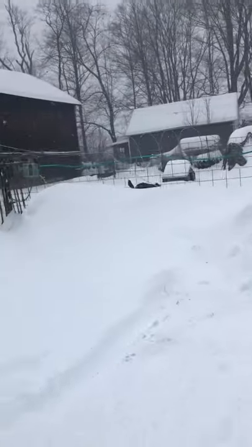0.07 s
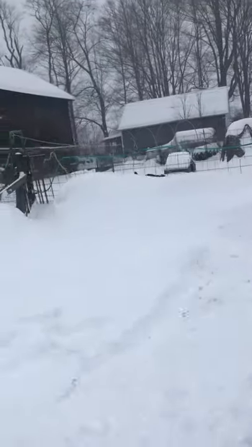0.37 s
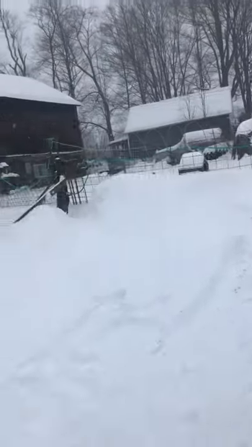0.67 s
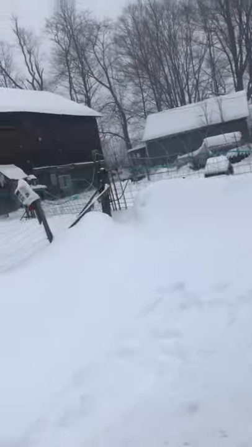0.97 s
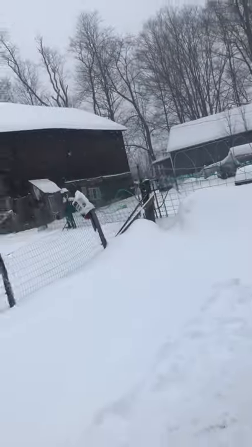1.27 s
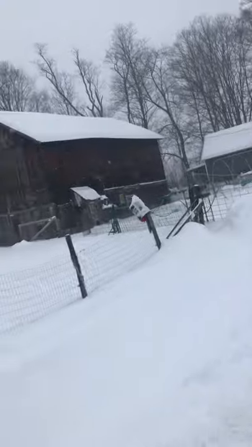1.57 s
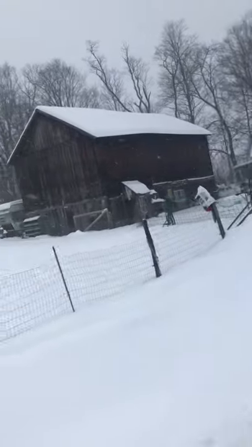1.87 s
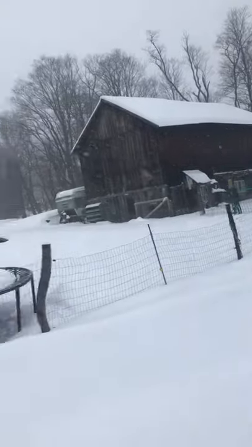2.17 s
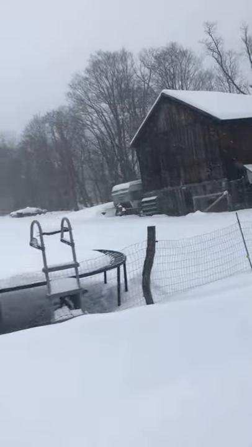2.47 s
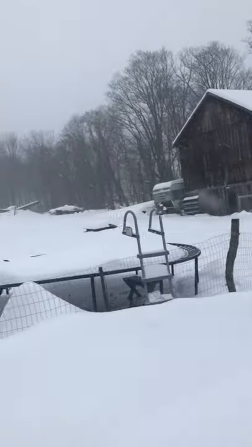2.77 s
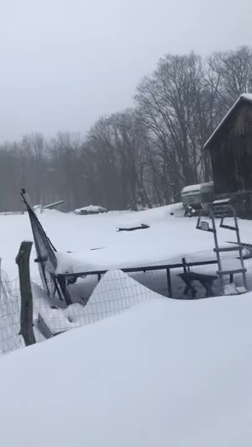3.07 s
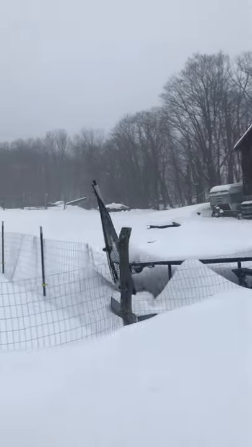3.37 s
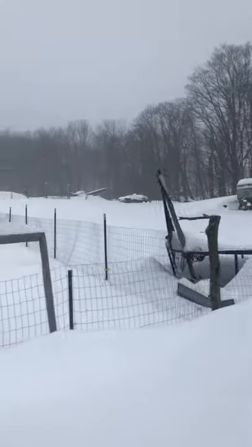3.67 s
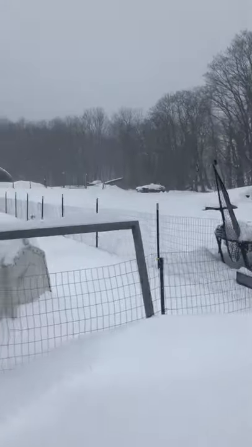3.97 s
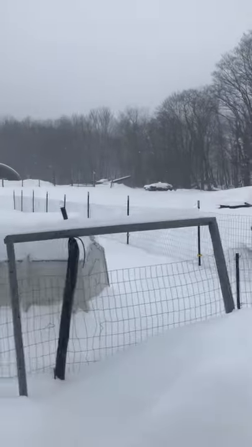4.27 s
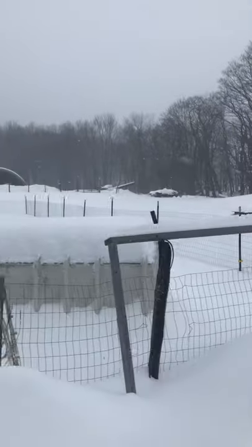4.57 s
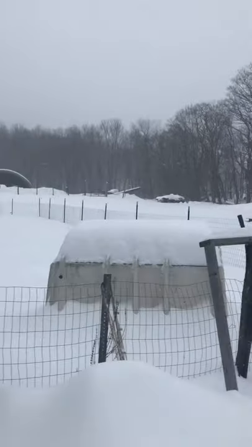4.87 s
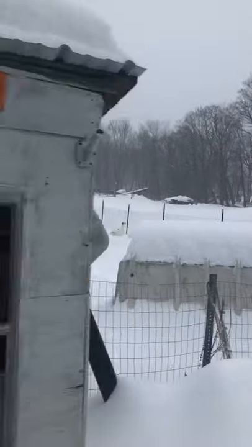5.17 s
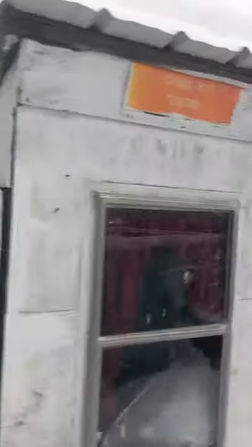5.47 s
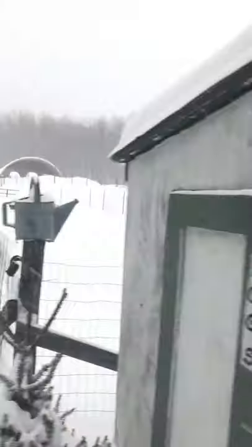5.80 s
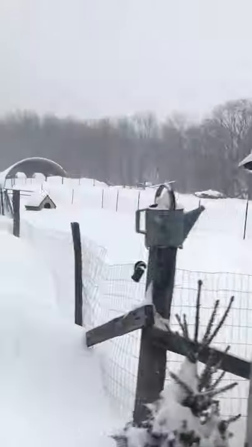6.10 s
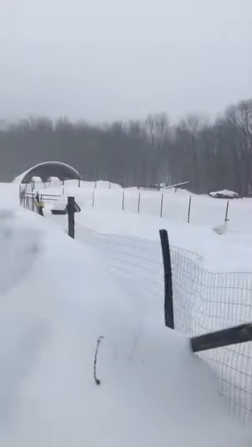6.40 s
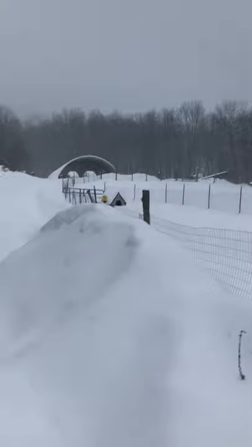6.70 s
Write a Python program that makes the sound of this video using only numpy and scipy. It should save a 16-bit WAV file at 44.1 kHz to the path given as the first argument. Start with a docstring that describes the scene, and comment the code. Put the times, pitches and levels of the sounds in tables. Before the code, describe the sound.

A deep, pulsing engine drone fills the cab of a pickup creeping through a snowy farmyard, with the microphone at the seat beside an open window. Snow crunches under the tyres with many small dull thuds, and ruts jolt the rumbling body. Light rustles and ticks sound nearby over a soft hiss of air. The drone weakens as the engine speeds up slightly, then a shed whooshes softly past and the cab briefly shudders.

```python
"""A pickup, a V8 by its sound, rolls slowly past a snowy farmyard, heard inside with a window open.
Its exhaust pulses boom in the cab at low revs, then thin out as the engine speeds up.
The body rumbles and thumps over ruts, the tyres scrunch and squeak on packed snow, and air hisses
at the window. Something close by rustles and ticks, and a few faint, very high tones come and go.
Late on, a shed wall whooshes past."""
import sys
import numpy as np
from scipy import signal
from scipy.fft import rfft, irfft
from scipy.io import wavfile
from scipy.ndimage import uniform_filter1d, map_coordinates

SR = 44100
rng = np.random.default_rng(int(sys.argv[2]) if len(sys.argv) > 2 else 0)


def file_out(sig):
    """Save sig as 16-bit WAV at sys.argv[1]."""
    # one column per channel
    cols = np.atleast_2d(sig).T
    # limit, then scale
    lim = np.clip(cols, -1, 1)
    pcm = np.round(lim * 32767).astype(np.int16)
    wavfile.write(sys.argv[1], SR, pcm)


N = 306054
TIME = np.arange(N) / SR


def undb(db):
    """Turn decibels into a gain."""
    return 10 ** (np.asarray(db) / 20)


def unit(x):
    """Scale to an average (rms) level of 1."""
    return x / np.sqrt(np.mean(x ** 2))


def curves(table):
    """Join the points in each column of a time table with straight lines."""
    times, *columns = np.transpose(table)
    return [np.interp(TIME, times, column) for column in columns]


def walk(rate_hz):
    """A smooth random wander, about 1 in size, with no big jumps."""
    size = 4096
    f = np.arange(size // 2 + 1) * SR / N
    coarse = irfft(rfft(rng.standard_normal(size)) / (1 + (f / rate_hz) ** 4), size)
    smooth = np.interp(TIME, np.linspace(0, TIME[-1], size), coarse)
    return unit(np.tanh(unit(smooth) / 2))


def colour(x, spectrum):
    """Shape the lows and highs of a sound by (f/Hz, level/dB) points."""
    hz, db = np.transpose(spectrum)
    f = np.maximum(np.arange(N // 2 + 1) * SR / N, 1)
    gain = undb(np.interp(np.log(f), np.log(hz), db, left=-80, right=-80))
    return unit(irfft(rfft(x) * gain, N))


def band(x, lo_hz, hi_hz):
    """Keep the sound between two frequencies."""
    return signal.sosfilt(signal.butter(3, [lo_hz, hi_hz], "bandpass", fs=SR, output="sos"), x)


def noise_band(lo_hz, hi_hz):
    """Steady noise between two frequencies."""
    return unit(band(rng.standard_normal(N), lo_hz, hi_hz))


def grains(per_s, spread_db):
    """Random clicks, mostly small, a few larger."""
    chance, size, sign = rng.random(N), rng.exponential(size=N), rng.choice([-1, 1], N)
    return (chance < per_s / SR) * sign * undb(spread_db * np.minimum(size, 3))


def burst(decay_s, rise):
    """Noise that swells and dies away; rise is a share of the decay time."""
    age = TIME[:SR // 5] / max(decay_s, .002)
    shape = (1 - np.exp(-age / rise)) * np.exp(-age)
    return rng.standard_normal(len(age)) * shape / shape.max()


def even(x, length_s):
    """Give a burst the energy of a level-1 sound of this length."""
    return x / np.sqrt(np.sum(x ** 2) / (length_s * SR))


def add(out, s, sound):
    """Mix a sound in at s seconds."""
    i = max(int(s * SR), 0)
    out[i:i + len(sound)] += sound[:N - i]


# How fast the cylinders fire: t/s, f/Hz
FIRING_RATE = [(0.0, 87.35), (0.5, 88.37), (1.41, 80.54), (2.2, 78.57), (3.09, 79.27), (3.59, 82.44),
               (4.1, 92.5), (4.64, 89.58), (5.08, 90.3), (5.6, 95.2), (5.78, 100.6), (6.0, 101.5),
               (6.25, 96.5), (6.94, 92.8)]
# The exhaust's boom in the cab: t/s, level/dB
BOOM = [(0.05, -20), (0.64, -20.5), (1.0, -19), (2.2, -20.5), (3.41, -19), (3.58, -19.5), (3.92, -28),
        (4.15, -33.5), (4.36, -35.5), (4.68, -27.5), (4.92, -30.5), (5.2, -48.5), (5.91, -29.5),
        (6.23, -41.5), (6.9, -28.5)]
# Throbs of the boom at higher revs: t/s, level/dB
THROBS = [(5.439, -22.5), (5.753, -18.5), (6.244, -16), (6.329, -21.5), (6.509, -21.5), (6.584, -35),
          (6.803, -44)]
# Tones around the boom: t/s, level/dB at twice its pitch, level/dB at three times, lope gain/dB
OVERTONES = [(0.0, -30, -41, -10), (0.65, -26.5, -42.5, -0.5), (1.05, -36.5, -45.5, -13.5),
             (1.6, -48, -53.5, -8), (2.3, -47.5, -52, -6), (2.6, -37.5, -45, -2), (3.45, -46, -44.5, -5),
             (3.65, -34, -55, -1), (3.9, -28.5, -36.5, -4), (4.1, -39.5, -41, 4), (4.3, -36.5, -52, -6.5),
             (4.55, -36, -38, 3.5), (4.75, -36, -33, -2), (5.15, -47, -46, -2), (5.65, -46, -39.5, -1),
             (5.92, -50, -49, 1), (6.2, -46.5, -56, -3), (6.9, -55, -55, -1.5)]
# The lope, tones from uneven cylinders: multiple of the engine's cycle rate, level/dB
LOPE = [(5, -45), (6, -50.5), (7, -41.5), (9, -46), (12, -48.5), (13, -46), (15, -55), (17, -53), (18, -51),
        (21, -49.5), (32, -58), (37, -54), (40, -61)]
# Pitches that the air in the cab boosts or dulls: f/Hz, width/Hz, gain/dB
CAB_RESONANCES = [(165.8, 8.8, 14.5), (268, 11, -5)]

def engine(throb_s=0.026):
    """Eight firings a cycle make the boom; as it thins, it flutters and its overtones break up."""
    firing_hz, = curves(FIRING_RATE)
    boom_db, = curves(BOOM)
    *overtones_db, lope_db = curves(OVERTONES)
    firing_phase = 2 * np.pi * np.cumsum(firing_hz) / SR
    thin_db = boom_db.max() - boom_db
    phase_wobble = 0.056 * thin_db
    flutter_db = (0.13 + 0.25 * thin_db) * walk(27)
    throb = sum(undb(db - 6) * np.exp(-((TIME - s) / throb_s) ** 2) for s, db in THROBS)
    out = -(undb(boom_db - 0.2 + flutter_db) + throb) * np.cos(firing_phase)
    for multiple, db in enumerate(overtones_db, 2):
        rough_db = (1 + 0.19 * thin_db) * walk(23.4)
        out -= undb(db + rough_db) * np.cos(multiple * firing_phase + phase_wobble * walk(10))
    for multiple, db in LOPE:
        ratio = multiple / 8
        cab_db = sum(gain / (1 + (2 * (ratio * firing_hz - hz) / width) ** 2)
                     for hz, width, gain in CAB_RESONANCES)
        phase = ratio * firing_phase + 2 * np.pi * rng.random() + phase_wobble * walk(7.7)
        out += undb(db + lope_db + cab_db + 4 * walk(6.8)) * np.cos(phase)
    return np.sqrt(2) * out


# The tone of the body's rumble: f/Hz, level/dB
RUMBLE_TONE = [(20, -32), (32, -14), (50, -1), (65, -6.5), (95, 1.5), (130, 0.5), (220, 1), (290, -4.5),
               (400, -20), (700, -27.5)]
# How hard the ruts shake it: t/s, deep part level/dB, upper part level/dB
RUTS = [(0.05, -39, -41), (1.02, -40.5, -41), (1.48, -35.5, -39.5), (1.9, -41, -43.5), (2.57, -49, -44.5),
        (3.41, -36.5, -41), (3.58, -39, -43.5), (4.57, -39.5, -42), (4.91, -44, -43.5), (5.16, -53.5, -49),
        (5.51, -39, -38.5), (5.92, -45, -45.5), (6.17, -42, -60), (6.46, -43, -42), (6.9, -44, -65)]

def body_rumble(gain_db=8, jolt_db=1.8, split_hz=140):
    """The truck's body rumbles as it rides over the ruts."""
    deep_db, upper_db = curves(RUTS)
    body = colour(rng.standard_normal(N), RUMBLE_TONE) * undb(gain_db + jolt_db * walk(8))
    deep = signal.sosfiltfilt(signal.butter(3, split_hz, fs=SR, output="sos"), body)
    return deep * undb(deep_db) + (body - deep) * undb(upper_db)


# The tone of tyres on snow: f/Hz, level/dB
TYRE_TONE = [(150, -3), (300, 1.5), (420, 2.5), (560, -2), (750, -4.5), (1000, -7.5), (1150, -10.5),
             (1380, -17), (1780, -18), (2100, -21.5), (2750, -27), (3300, -23.5), (4200, -31.5),
             (6500, -55.5)]
# How loud they are: t/s, level/dB
TYRE_LEVEL = [(0.05, -41.5), (1.67, -42), (1.9, -44.5), (2.24, -43), (2.51, -44.5), (3.25, -40.5),
              (3.9, -42), (4.19, -40), (5.15, -41.5), (5.42, -41.5), (5.62, -39), (5.75, -40), (6.9, -42.5)]

def tyres(gain_db=2, grit=0.68):
    """Grains of snow crush under the treads in a steady, gritty noise."""
    db, = curves(TYRE_LEVEL)
    crush = rng.standard_normal(N) + grit * unit(grains(per_s=500, spread_db=0.5))
    return colour(crush, TYRE_TONE) * undb(db + gain_db + 1.13 * walk(22))


# The tone of the air at the window: f/Hz, level/dB
AIR_TONE = [(500, -7), (1500, 8), (1900, 4), (2700, 3.5), (3300, -1.5), (4000, 2.5), (5600, 0), (7000, -4),
            (8400, -5.5), (10000, -10.5), (12500, -10), (16000, -14.5)]
# How loud it is: t/s, level/dB
AIR_LEVEL = [(0.05, -57), (0.12, -58.5), (1.15, -59.5), (1.46, -59.5), (1.84, -61.5), (2.43, -62),
             (2.78, -59), (3.9, -57.5), (4.36, -56.5), (4.48, -54), (4.69, -51.5), (5.3, -53.5),
             (5.79, -51), (6.08, -55.5), (6.69, -57), (6.9, -53)]

def window_air():
    """Air hisses past the open window with a slight fizz."""
    db, = curves(AIR_LEVEL)
    fizz = rng.standard_normal(N) + 0.34 * unit(grains(per_s=220, spread_db=4))
    return colour(fizz, AIR_TONE) * undb(db + 0.9 * walk(7.9))


def flakes(gain_db=-42):
    """A sparse, very fine patter, perhaps snowflakes landing close by."""
    return undb(gain_db) * band(grains(per_s=14, spread_db=3), lo_hz=8000, hi_hz=14400)


# Lumps of snow under the tyres: t/s, crunch level/dB, thud level/dB, thud f/Hz, thud delay/s
SNOW_LUMPS = [(0.184, -43.5, -42, 310, 0.026), (0.286, -42, -38, 280, 0.0034),
              (0.372, -44, -22, 304, 0.00041), (0.401, -41, -38, 320, 0.017),
              (0.678, -48, -25.5, 296, 0.009), (1.104, -39.5, -31, 350, 0.018),
              (1.405, -37.5, -25, 310, 0.019), (1.486, -37.5, -26.5, 330, 0.012),
              (1.721, -46, -27, 303, 0.003), (1.788, -49, -26, 310, 0.0027),
              (1.961, -40.5, -26, 362, 0.003), (2.104, -39.5, -29.5, 340, 0.00069),
              (2.169, -42, -27, 300, 0.014), (2.363, -45, -42, 338, 0.005), (2.455, -37.5, -29, 362, 0.014),
              (2.475, -50, -27, 340, 0.0021), (2.57, -41, -30, 320, 0.015), (2.731, -42, -28, 320, 0.011),
              (2.778, -41, -32, 327, 0.0011), (2.983, -41, -24.5, 345, 0.0031),
              (3.08, -43, -38, 330, 0.008), (3.131, -46, -28, 324, 0.011), (3.166, -33.5, -27, 329, 0),
              (3.221, -35, -30, 310, 0.019), (3.36, -33, -21, 405, 0.015),
              (3.486, -42, -22.5, 303.5, 0.0063), (3.529, -39, -27, 307, 0.01),
              (3.603, -39, -23, 300, 0.0059), (3.656, -37.5, -26.5, 334, 0.0066),
              (3.759, -36, -21, 363, 0.025), (3.799, -40, -25, 330, 0.008),
              (3.879, -38.5, -22.5, 270, 0.0042), (4.018, -38, -24, 327, 0.0099),
              (4.119, -41, -46, 400, 0.0071), (4.287, -35, -43, 359, 0.021),
              (4.317, -43, -25, 340.2, 0.0079), (5.05, -37, -39, 310, 0.023),
              (5.111, -47, -25.5, 343, 0.005), (5.242, -37, -24.5, 407, 0.0068),
              (5.327, -54, -23.5, 330, 0.004), (5.587, -38, -34, 328, 0), (5.644, -35.5, -26, 318, 0.011),
              (6.231, -38.5, -42, 330, 0.016), (6.318, -40.5, -23.5, 320, 0.017)]

def scrunches(crunch_s=0.0091, thud_s=0.0041, thud_rise_s=0.0013, scuff_s=0.01303, sag=0.2):
    """A lump gives way with a dull, gritty crunch, then a thud that drops in pitch inside a scuff."""
    out, t = np.zeros(N), TIME[:SR // 20]
    fade = np.exp(-t / thud_s)
    swell = (1 - np.exp(-(t / thud_rise_s) ** 2)) * fade
    glide = 1 + sag * (2 * fade - 1)
    for s, crunch_db, thud_db, hz, delay in SNOW_LUMPS:
        shift = rng.uniform(0.85, 1.15)  # each crunch has its own tone
        crunch = band(burst(crunch_s, rise=0.16), 420 * shift, 1000 * shift)
        grit = undb(-18) * band(burst(crunch_s, rise=0.048), 1000, 2100)
        add(out, s - .001, undb(crunch_db + 0.5) * even(crunch + grit, crunch_s))
        thud = swell / swell.max() * np.sin(2 * np.pi * (np.cumsum(hz * glide) / SR + rng.random()))
        add(out, s + delay, undb(thud_db) * thud)
        scuff = band(burst(scuff_s, rise=0.31), 0.7 * hz, 1.67 * hz)
        add(out, s + delay - scuff_s / 2, undb(thud_db - 10) * even(scuff, scuff_s))
    return out


# Tiny ticks: t/s, level/dB
TICKS = [(0.234, -41), (0.4864, -34.5), (0.9504, -40.5), (1.1372, -38), (2.2503, -47), (3.5917, -48),
         (6.761, -45)]

def ticks(gain_db=-1, decay_s=0.00033):
    """Something close by makes pin-sharp ticks."""
    out, t = np.zeros(N), TIME[:SR // 100]
    for s, db in TICKS:
        tick = band(rng.standard_normal(len(t)) * np.exp(-t / decay_s), 7500, 15000)
        add(out, s, undb(db + gain_db) * tick / np.abs(tick).max())
    return out


# Rustles and snaps: t/s, level/dB, decay/s, top f/Hz
RUSTLES = [(0.476, -43, 0.0096, 5000), (1.199, -38.5, 0.0091, 6500), (1.274, -41, 0.0095, 8500),
           (1.485, -41, 0.002, 8500), (1.5, -44.5, 0.027, 13000), (1.707, -37.5, 0.005, 4800),
           (2.541, -42.5, 0.036, 9000), (2.875, -41.5, 0.01, 2980), (2.957, -41, 0.025, 9000),
           (3.213, -45, 0.034, 7000), (3.526, -41, 0.014, 6500), (3.642, -43.5, 0.018, 6500),
           (3.776, -39.5, 0.02, 5500), (4.214, -42.5, 0.018, 8000), (4.284, -37, 0.018, 6500),
           (4.359, -35.5, 0.014, 7000), (4.434, -32.5, 0.0087, 8500), (4.497, -35, 0.004, 7000),
           (4.508, -36.5, 0.0087, 8055), (4.583, -28.5, 0.011, 8040), (5.072, -38.5, 0.014, 7000),
           (5.246, -38.5, 0.0099, 5000), (5.766, -41, 0.025, 6000), (6.307, -42, 0.04, 6500),
           (6.582, -40, 0.0097, 2400)]
# The pitches they ring at: f/Hz, width/Hz, level/dB
RUSTLE_RESONANCES = [(1610, 960, 7.5), (2350, 710, -1), (3380, 1300, 2.5), (4200, 620, -3),
                     (5740, 750, 1.5), (6940, 1100, -9), (9900, 1500, -10)]

def rustles(gain_db=-1, low_hz=1300):
    """Something close by brushes or snaps, dry and brief, with a little ring."""
    out = np.zeros(N)
    for s, db, decay_s, top_hz in RUSTLES:
        scrape = burst(decay_s, rise=0.2)
        ring = sum(undb(ring_db) * signal.lfilter(*signal.iirpeak(hz, hz / width, fs=SR), scrape)
                   for hz, width, ring_db in RUSTLE_RESONANCES)
        brush = band(ring + undb(-12) * scrape, low_hz, top_hz)
        add(out, s - .001, undb(db + gain_db) * brush / np.abs(brush).max())
    return out


# Thumps over ruts: t/s, level/dB, f/Hz
BUMPS = [(1.016, -26, 165), (1.194, -30, 168), (1.495, -22.5, 139.8), (1.728, -27, 168), (1.831, -24, 122),
         (1.981, -23, 133.4), (2.171, -25, 147.7), (2.483, -37, 178), (2.746, -29.5, 149),
         (3.233, -27.5, 148.4), (4.035, -23.5, 128.8), (5.122, -30.5, 140), (5.94, -27, 165.2),
         (6.339, -30, 170), (6.655, -32, 180.2)]

def bumps(width_s=0.018, sag=0.12):
    """A rut jolts the body: a soft, short thump that drops in pitch."""
    out = np.zeros(N)
    for s, db, hz in BUMPS:
        from_peak = (TIME - s) / width_s
        falling_hz = hz * (1 - sag * np.tanh(from_peak))
        phase = 2 * np.pi * (np.cumsum(falling_hz) / SR + rng.random())
        out += undb(db) * np.exp(-from_peak ** 2) * np.sin(phase)
    return out


# Breathy whistles: start t/s, end t/s, level/dB, f/Hz, half-width as a share of f
WHISTLES = [(1.3, 1.657, -60.5, 3750, 0.15), (2.495, 3.019, -64.5, 3338, 0.025),
            (4.278, 4.41, -58, 3430, 0.05), (4.796, 5.08, -46.5, 909.6, 0.097),
            (5.2, 5.33, -62, 3292, 0.035), (5.914, 6.204, -64, 3290, 0.025),
            (6.269, 6.445, -58, 3367, 0.05)]

def whistles(gain_db=-1, waver_db=2, pitch_drift=0.012):
    """Faint bands of hiss waver and break up, like air catching an edge."""
    out = np.zeros(N)
    for start, end, db, hz, share in WHISTLES:
        progress = np.clip((TIME - start) / (end - start), 0, 1)
        swell = np.sqrt(np.abs(np.sin(np.pi * progress)))
        out += undb(db + gain_db) * swell * noise_band(hz * (1 - share), hz * (1 + share))
    drift = np.cumsum(pitch_drift * walk(12))  # running fast or slow bends the pitch
    drift -= uniform_filter1d(drift, size=SR // 4)  # keeps the whistles on time
    return map_coordinates(out, [np.arange(N) + drift], order=1) * undb(waver_db * walk(20))


# Snow squeaks: t/s, level/dB, start f/Hz, end f/Hz, length/s
SQUEAKS = [(2.3234, -31.5, 1480, 450, 0.007), (2.523, -37, 1500, 900, 0.0026),
           (2.546, -41, 2000, 900, 0.0035), (2.691, -42, 1500, 600, 0.004)]

def squeaks():
    """Cold snow slips for an instant, falling in pitch."""
    out = np.zeros(N)
    for s, db, start_hz, end_hz, length in SQUEAKS:
        progress = np.linspace(0, 1, int(length * SR))
        phase = 2 * np.pi * np.cumsum(start_hz * (end_hz / start_hz) ** progress) / SR
        swell = np.abs(np.sin(np.pi * progress ** .5)) ** .5
        add(out, s, undb(db) * swell * np.sin(phase))
    return out


# Faint, brief, very high tones: t/s, level/dB, f/Hz
HIGH_TONES = [(2.565, -61, 9480), (3.224, -60, 13100), (3.692, -58, 13130), (4.216, -61, 9850),
              (4.338, -60, 13200), (5.499, -54, 8740)]

def high_tones(decay_s=0.0098, rise_s=0.002):
    """Faint, very high tones sound for a moment and fade."""
    out, t = np.zeros(N), TIME[:SR // 10]
    shape = (1 - np.exp(-t / rise_s)) * np.exp(-t / decay_s)
    for s, db, hz in HIGH_TONES:
        add(out, s, undb(db) * shape * np.sin(2 * np.pi * hz * t))
    return out


def shed_whoosh(at_s=5.7, level_db=-52, width_s=0.13):
    """A short whoosh as a shed wall goes by."""
    swell = np.exp(-((TIME - at_s) / width_s) ** 2)
    return undb(level_db) * swell * noise_band(lo_hz=974, hi_hz=2156)


def cab_shudder(at_s=5.92, level_db=-32, width_s=0.2):
    """At the highest revs the cab shudders: a low rumble swells and settles."""
    swell = np.exp(-((TIME - at_s) / width_s) ** 2)
    return undb(level_db) * swell * noise_band(lo_hz=70.27, hi_hz=113.7)


def scene():
    """Everything as heard from the seat, in one channel."""
    ongoing = engine() + body_rumble() + tyres() + window_air() + flakes()
    brief = scrunches() + ticks() + rustles() + bumps() + whistles() + squeaks() + high_tones()
    return (ongoing + brief + shed_whoosh() + cab_shudder())[None]


def record(dry):
    """The phone adds a faint, even hiss and cuts the highest treble."""
    hiss = undb(-72) * rng.standard_normal(dry.shape)
    treble_cut = signal.ellip(12, .2, 80, 15700, fs=SR, output="sos")
    return signal.sosfilt(treble_cut, dry + hiss)


dry = scene()
out = record(dry)
file_out(out)
```